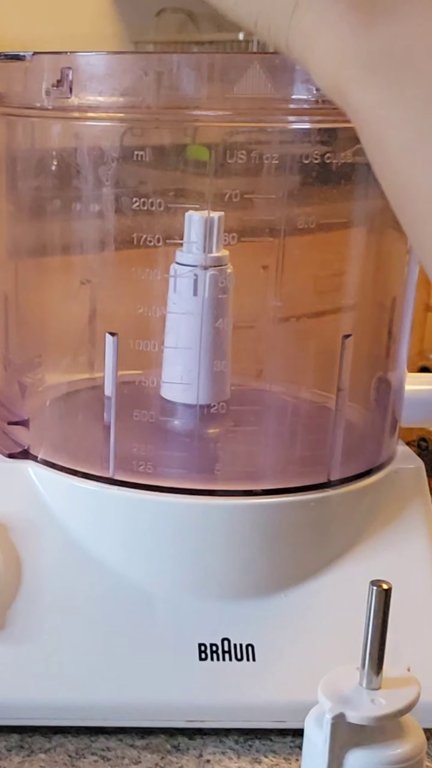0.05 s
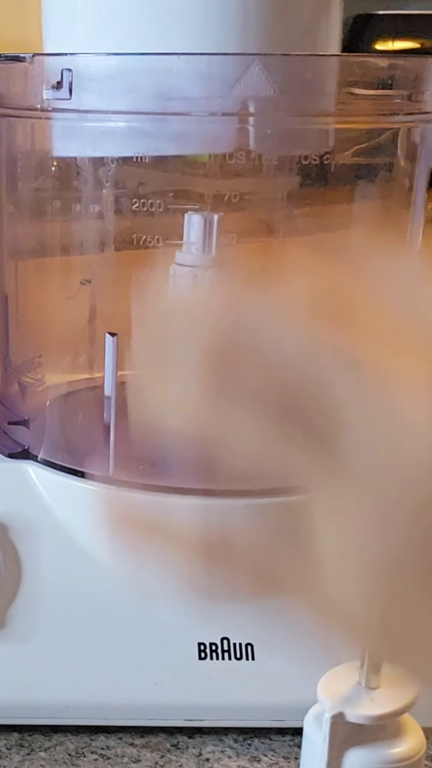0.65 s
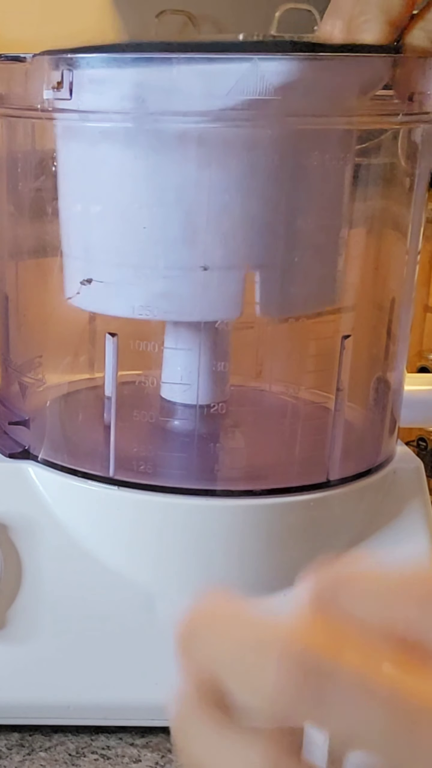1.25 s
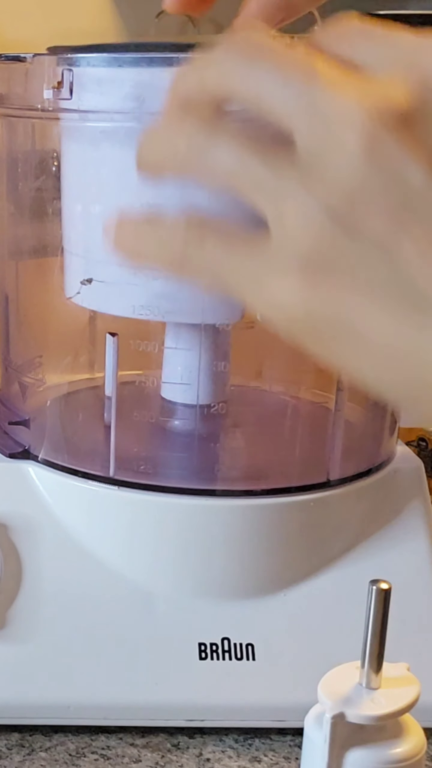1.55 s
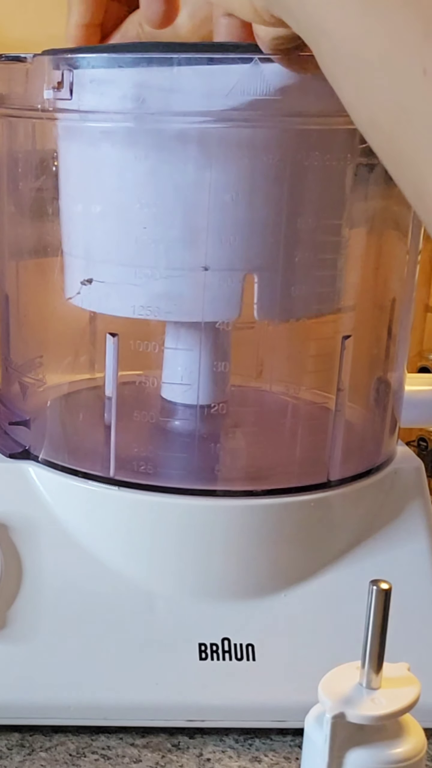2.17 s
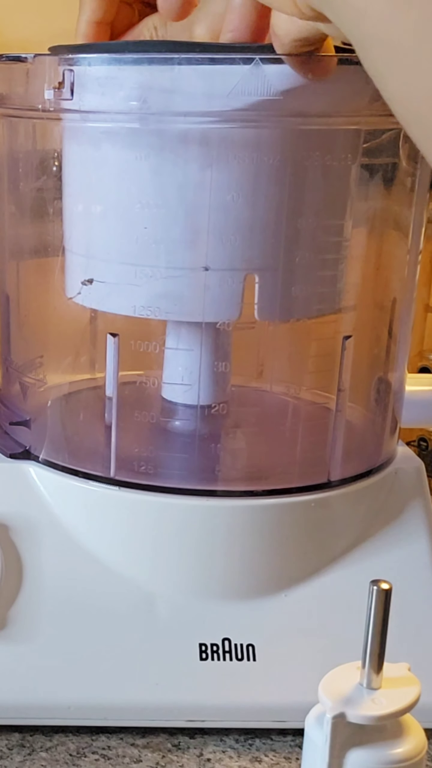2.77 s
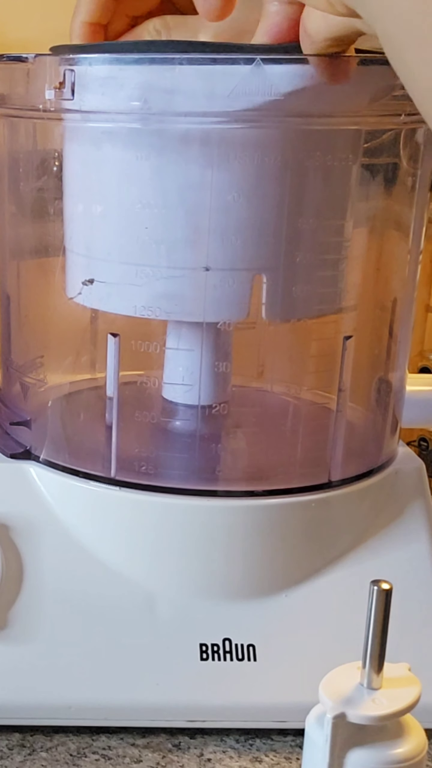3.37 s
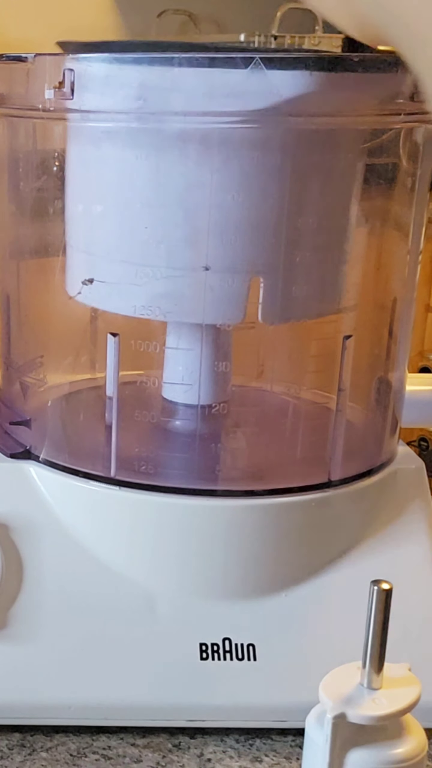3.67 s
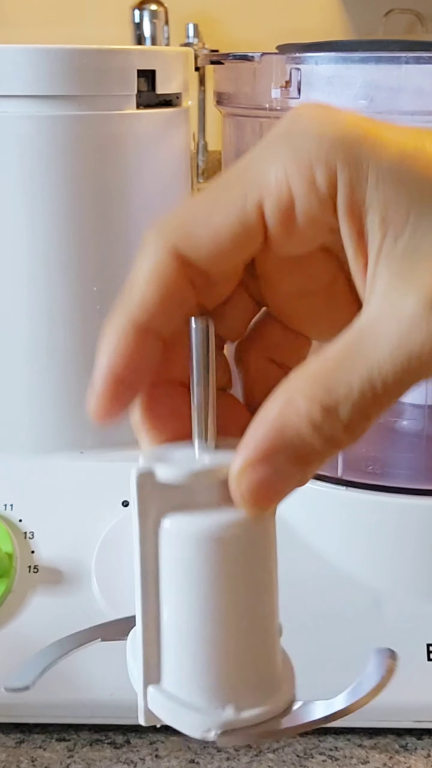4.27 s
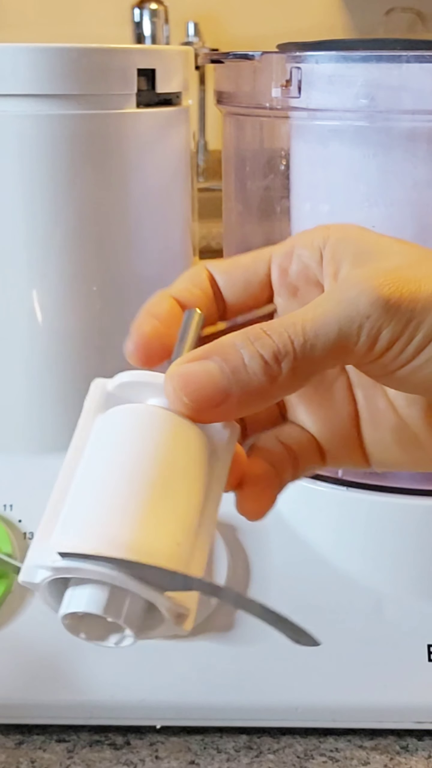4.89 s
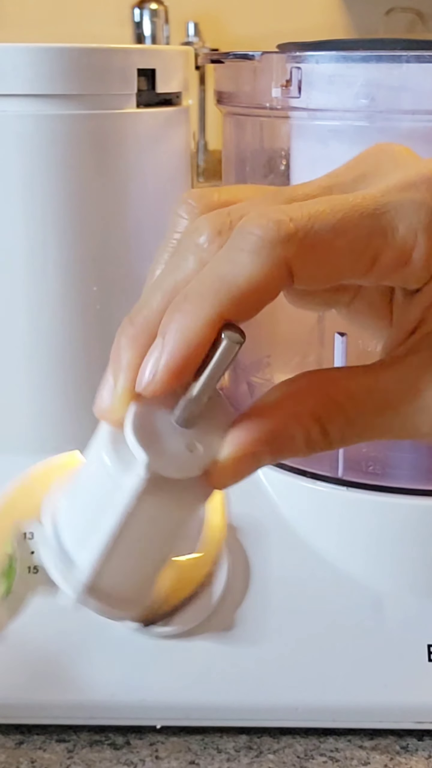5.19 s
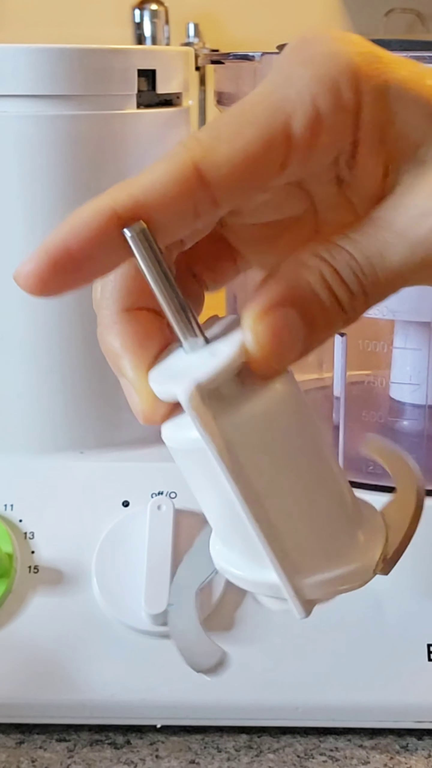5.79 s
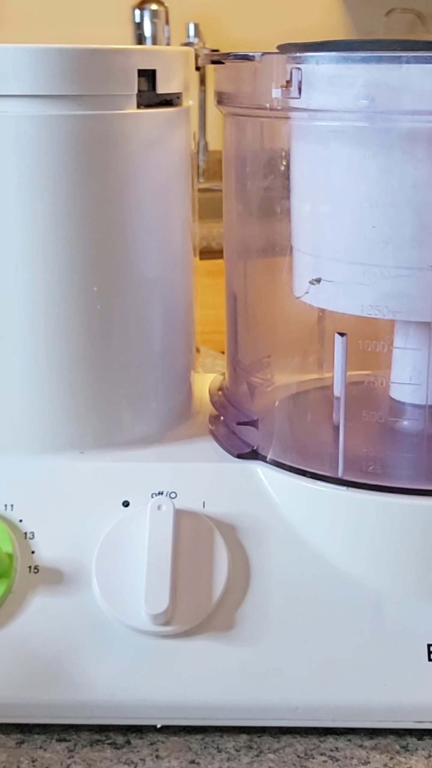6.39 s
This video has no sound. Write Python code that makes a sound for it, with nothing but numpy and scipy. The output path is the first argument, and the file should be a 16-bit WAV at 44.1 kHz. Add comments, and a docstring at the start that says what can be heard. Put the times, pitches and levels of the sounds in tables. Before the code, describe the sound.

A food processor is assembled close to the microphone, slightly to the left, in a small, quiet kitchen. After a faint click and light brushing, a plastic insert taps the bowl at about 0.6 seconds. From 0.8 to 1.3 seconds comes the loudest part: a quick cluster of hollow plastic knocks, each ringing briefly and thudding through the base into the worktop, with one tiny squeak near 1 second. From 1.5 to 2.6 seconds the insert is turned, with low rubbing, short scrapes on the rim and softer, thinning taps. Between 3.2 and 3.7 seconds another group of light clicks and a short scrape seat it. From there until the end, around 6.5 seconds, only the background that runs throughout remains: soft room noise, a low appliance hum and a very faint, thin electrical whine.

```python
"""A plastic insert is lowered into a food processor bowl, knocks onto the spindle and is turned until it seats.
Each knock rings the hollow bowl and its thin walls, and thuds through the base into the worktop.
Turning makes the bowl murmur and squeak once; between knocks, plastic and fingers slide on the rim.
The small kitchen is quiet but for soft room noise, a low appliance hum and a thin electrical whine."""
import sys
import numpy as np
from scipy import signal
from scipy.fft import rfft, irfft, next_fast_len
from scipy.io import wavfile

SR = 44100
rng = np.random.default_rng(int(sys.argv[2]) if len(sys.argv) > 2 else 0)


def digitize_waveform(pressure):
    """Quantize a signal to 16-bit integers and store it at the path in sys.argv[1].

    Rows of a 2-D input are taken as channels; values are limited to [-1, 1].
    """
    field = np.atleast_2d(pressure).T
    bounded = np.clip(field, -1, 1)
    quanta = np.round(bounded * 32767).astype(np.int16)
    wavfile.write(sys.argv[1], SR, quanta)


N = 288414

# The knocks: t/s, force/dB, hardness (0 cushioned, 1 bare edge), nearness to the stiff rim/dB,
# pitch favoured by the spot that is hit/Hz
CONTACTS = [(0.586, -34.5, 0.72, -5.5, 249), (0.8016, -23.5, 0.29, 1, 354), (0.931, -24.5, 0.67, -13, 376),
            (0.956, -26.5, 0.21, -3.5, 365), (1.0165, -23, 0.23, -1, 277), (1.025, -29, 0.64, 7, 1310),
            (1.243, -29, 0.14, -4, 800), (1.3036, -29.5, 0.1, -5.5, 266), (1.312, -36.5, 0.04, 12, 1440),
            (1.453, -41.5, 0.94, -2, 280), (1.493, -45.5, 0.093, -0.5, 290), (1.534, -43, 0, 2.5, 1430),
            (1.559, -44, 0.11, -7, 272), (1.608, -43.5, 0.16, -4.5, 282), (1.695, -47, 0, -5, 806),
            (1.728, -48.5, 0, 3, 1470), (1.817, -46, 0.21, -3, 278), (2.139, -43, .3, 3.5, 298),
            (2.403, -47, 0.079, -8.5, 750), (2.637, -46.5, 0.24, -2.5, 287), (3.222, -40, 0.77, 6.5, 1520),
            (3.2278, -40.5, 0.73, 7, 282), (3.419, -48, 0.3, -1.5, 276), (3.504, -40, 0.23, 3.5, 280),
            (3.513, -47, 0.12, 2.5, 1630), (3.624, -47.5, 0.96, 2.5, 270), (3.638, -44.5, 0.74, 6, 1300),
            (3.679, -41.5, 0, 1, 1300), (3.688, -40, 0, -4, 368)]
ORDINARY_DB = -32   # force of an ordinary knock
# The tones at which bowl and insert ring: f/Hz, level/dB, time to fade by 60 dB/s
BOWL_TONES = [(225, -10.5, 0.062), (265.5, 1.5, 0.094), (294, 0.5, 0.073), (371.5, 1, 0.085),
              (475, -12, 0.097), (632, -0.5, 0.042), (705, 3, 0.12), (811.7, 4.5, 0.061), (988, -26, 0.18),
              (1150, -18, 0.027), (1307, -1, 0.077), (1467, 4, 0.044), (1527, -11.5, 0.093),
              (1873, -5.5, 0.05), (2340, -12.5, 0.12), (2430, -12, 0.072), (3004, -7, 0.11),
              (3730, -11, 0.14), (4280, -4, 0.057), (5350, -40, 0.083)]
# How alike left and right are for nearby sounds: f/Hz, likeness (1 same, -1 opposite)
NEAR_LIKENESS = [(100, 1), (300, 0.89), (700, 0.48), (1400, 0.26), (3000, -0.32), (8000, 0.15)]


def from_db(db):
    """Turn decibels into a gain."""
    return 10 ** (np.asarray(db) / 20)


def rms_one(x):
    """Scale a signal to an average strength (rms) of 1."""
    return x / np.sqrt(np.mean(x ** 2) + 1e-20)


def at_hz(points, hz):
    """Read between the rows of a table, giving each octave equal room."""
    f, value = np.transpose(points)
    return np.interp(np.log(np.maximum(hz, 1)), np.log(f), value)


def add(out, s, sound):
    """Mix a sound in, starting at s seconds."""
    start = max(round(s * SR), 0)
    out[:, start:start + sound.shape[-1]] += sound[:, :N - start]


def band(x, low, high):
    """Keep the frequencies between low and high."""
    return signal.sosfilt(signal.butter(3, [low, high], "band", fs=SR, output="sos"), x)


def resonance(x, hz, width_hz):
    """Let one pitch through at full strength and weaken the rest."""
    r = np.exp(-np.pi * width_hz / SR)
    feedback = [1, -2 * r * np.cos(2 * np.pi * hz / SR), r * r]
    return signal.lfilter(np.array([1, 0, -1]) * (1 - r * r) / 2, feedback, x)


def ring(force, hz, fade_s):
    """Each push starts a pure tone that fades by 60 dB in fade_s."""
    r, w = from_db(-60 / (fade_s * SR)), 2 * np.pi * hz / SR
    return signal.lfilter([0, np.sin(w)], [1, -2 * r * np.cos(w), r * r], force + 1e-18)


def stereo_noise(spectrum, likeness, size):
    """Shaped noise whose left and right agree as far as the likeness table says."""
    hz = np.fft.rfftfreq(size, 1 / SR)
    mid, side = rfft(rng.standard_normal((2, size)))
    alike = np.clip(at_hz(likeness, hz), -1, 1)
    both = np.sqrt(1 + alike) * mid + np.sqrt(1 - alike) * side * [[1], [-1]]
    return rms_one(irfft(both * from_db(at_hz(spectrum, hz)), size))


def long_noise(spectrum, likeness):
    """Stereo noise as long as the scene."""
    return stereo_noise(spectrum, likeness, size=next_fast_len(N, True))[:, :N]


def graininess(spread_db, per_s, size):
    """The uneven loudness of surfaces that catch and slip."""
    steps = np.arange(size) * per_s / SR
    heights = rng.standard_normal(size // 10 + 2)
    return rms_one(from_db(spread_db * np.interp(steps, np.arange(len(heights)), heights)))


def room_noise():
    """The low murmur of room air and a faint, far rush."""
    # Loudness over time: t/s, level/dB
    air_level = [(0, -55.5), (2.0, -54.5), (3.7, -54), (3.8, -53.5), (6.5, -55.5)]
    rush_level = [(0, -76), (3.7, -71.5), (3.8, -69), (5.0, -68.5), (6.5, -72.5)]
    # Tone colour: f/Hz, level/dB
    air_spectrum = [(20, -16), (32, -1.5), (55, -0.5), (95, 2), (122, -1.5), (162, 1.5), (185, -9.5),
                    (250, -5), (370, -15.5), (550, -15), (1400, -27.5), (2600, -36.5), (4500, -45.5),
                    (7000, -54), (9500, -63), (14500, -48.5)]
    rush_spectrum = [(200, -5), (500, 4), (1400, 16.5), (2400, -3.5), (5000, -78), (16000, -62.5)]
    # How alike left and right are: f/Hz, likeness (-1 to 1)
    likeness = [(40, 0.54), (150, 0.97), (300, 0.68), (650, 0.028), (1400, -0.29), (3000, 0.2),
                (12000, -0.14)]
    t = np.arange(N) / SR
    air = from_db(np.interp(t, *np.transpose(air_level))) * long_noise(air_spectrum, likeness)
    rush = from_db(np.interp(t, *np.transpose(rush_level))) * long_noise(rush_spectrum, likeness)
    return air + rush


def hum(steady):
    """Low appliance tones, each with a steady part and a part that wanders."""
    # The tones: f/Hz, width/Hz, level/dB, left over right/dB
    tones = [(39.7, 1, -52, 0), (79.4, 3, -65, 0), (159, 10, -68, 0), (200, 6, -66, 0)]
    t, out = np.arange(N) / SR, 0
    for hz, width_hz, db, pan_db in tones:
        smooth = signal.butter(2, width_hz / 2, fs=1000, output="sos")
        wander = signal.sosfilt(smooth, rng.standard_normal((2, 9000)))[:, 2000:]
        swell, drift = [np.interp(t * 1000, np.arange(len(w)), rms_one(w)) for w in wander]
        phase = 2 * np.pi * hz * t
        tone = rms_one((steady + swell) * np.sin(phase) + drift * np.cos(phase))
        out += tone * from_db(db + np.array([[pan_db], [-pan_db]]) / 2)
    return out


def whine(pitch_hz):
    """A thin electrical whine: narrow bands of noise at multiples of one pitch."""
    # The bands: multiple of the pitch, width/Hz, level/dB, left over right/dB
    bands = [(1, 57, -86, -8), (2, 70, -84.5, -10.5), (3, 1600, -94.5, -5.5)]
    out = 0
    for multiple, width_hz, db, pan_db in bands:
        hz = multiple * pitch_hz
        hiss = resonance(rng.standard_normal((2, N)), hz, width_hz)
        tone = rms_one(resonance(hiss, hz, width_hz=820))
        out += tone * from_db(db + np.array([[pan_db], [-pan_db]]) / 2)
    return out


def kitchen_echo(x, first_echo_s):
    """Reflections build up after the first echo; each octave dies away at its own pace."""
    # Length of the echo: f/Hz, time to fade by 60 dB/s
    fade_times = [(100, 0.07), (300, 0.17), (800, 0.28), (2000, 0.26), (5000, 0.25), (15000, 0.15)]
    # Strength of the echo: f/Hz, level/dB
    levels = [(100, -14.5), (300, -30), (800, -22), (2000, -26), (5000, -16), (15000, -16.5)]
    t = np.arange(SR // 2) / SR
    noise = stereo_noise([(20, 0), (20000, 0)], NEAR_LIKENESS, size=len(t))
    build_up = np.clip(t / first_echo_s - 1, 0, 1)
    response = 0
    for low in 62.5 * 2 ** np.arange(8):
        centre = low * np.sqrt(2)
        tail = band(noise, low, 2 * low) * from_db(-60 * t / at_hz(fade_times, centre)) * build_up
        response += from_db(at_hz(levels, centre)) * tail / np.sqrt(np.sum(tail ** 2) / 2)
    return signal.fftconvolve(x, response, axes=1)[:, :N]


def dry_clicks():
    """Faint, very short clicks with no ring."""
    # The clicks: t/s, level before softening/dB
    clicks = [(0.0631, -33.5), (3.7485, -41), (3.755, -47)]
    out = np.zeros((1, N))
    for s, db in clicks:
        add(out, s, from_db([[db]]))
    return signal.lfilter([.5], [1, -.5], out)


def slides(rim_db, hiss_db):
    """Plastic catches and slips in fine grains under each short stroke, and the rim rings along."""
    # The strokes: middle t/s, half length/s, level/dB
    strokes = [(0.005, 0.0088, -56.5), (0.049, 0.045, -69), (0.163, 0.027, -60), (0.244, .012, -68),
               (0.595, 0.016, -52), (0.64, 0.052, -72.5), (1.143, 0.065, -65.5), (1.295, 0.033, -58),
               (1.458, 0.021, -51), (1.784, 0.02, -66), (1.921, 0.02, -60), (2.02, 0.034, -65),
               (2.077, 0.021, -59), (2.149, 0.021, -64.5), (3.228, 0.023, -61.5), (3.385, 0.037, -73),
               (3.482, 0.024, -69), (3.648, .019, -47)]
    # Tone colour of the rubbing: f/Hz, level/dB
    rasp_spectrum = [(500, -7), (1500, -1), (2400, 0), (3400, -1), (4800, -4), (6500, -10), (10000, -13.5),
                     (16000, -35)]
    hiss_spectrum = [(2000, -33), (5000, -7.5), (7000, -11), (12000, 2), (16000, -2)]
    # Tones of the rubbed rim: f/Hz, width/Hz, level/dB
    rim_tones = [(1750, 220, 0), (2170, 71, -6), (3186, 300, 4.5), (3780, 540, 0), (4640, 190, 1),
                 (7700, 1200, 0), (11060, 340, 11)]
    t = np.arange(N) / SR
    pressure = sum(from_db(db) * np.exp(-np.minimum(((t - s) / half_s) ** 2, 20))
                   for s, half_s, db in strokes)
    friction = long_noise(rasp_spectrum, NEAR_LIKENESS)
    rim = sum(from_db(db) * resonance(friction, hz, width_hz) for hz, width_hz, db in rim_tones)
    rasp = rms_one(friction + from_db(rim_db) * rim)
    grains = graininess(spread_db=3.0, per_s=670, size=N)
    hiss = from_db(hiss_db) * long_noise(hiss_spectrum, NEAR_LIKENESS)
    return grains * pressure * (rasp + hiss)


def squeak(s, half_s, hz, fall_hz_per_s, db):
    """The insert sticks and slips on the spindle for a few cycles: a short, slightly falling chirp."""
    t = np.arange(N) / SR - s
    phase = 2 * np.pi * (hz * t - fall_hz_per_s * t * t / 2)
    swell = np.exp(-np.minimum((t / half_s) ** 2, 20))
    return from_db(db) * swell * (np.sin(phase) + 0.098 * np.sin(2 * phase))


def turning_effort(grip_s=0.018, ease_db_per_s=16, release_db_per_s=398):
    """Each turn takes hold, eases as the insert slips into place, and lets go."""
    # Turns of the insert: start t/s, length/s, level/dB
    turns = [(0.868, 0.32, -48.5), (1.458, 0.41, -49.5), (2.39, 0.014, -48.5), (3.188, 0.053, -50),
             (3.363, 0.049, -54), (3.666, 0.031, -42.5)]
    effort = 0
    for s, length_s, db in turns:
        t = np.maximum(np.arange(N) / SR - s, 0)
        fall_db = ease_db_per_s * t + release_db_per_s * np.maximum(t - length_s, 0)
        effort += np.minimum(t / grip_s, 1) * from_db(db - fall_db)
    return effort


def grind(shell_db):
    """Soft slips of the insert on the spindle keep the bowl murmuring."""
    # Tone colour of the slips: f/Hz, level/dB
    spectrum = [(100, 9), (250, 4), (800, -1), (1600, -11.5), (2200, -17.5), (5000, -35), (16000, -84)]
    slips = graininess(spread_db=4.5, per_s=170, size=N) * long_noise(spectrum, NEAR_LIKENESS)
    bowl = sum((-1) ** k * from_db(db) * resonance(slips, hz, np.log(1000) / (np.pi * fade_s))
               for k, (hz, db, fade_s) in enumerate(BOWL_TONES))
    return turning_effort() * rms_one(bowl + from_db(shell_db) * slips)


def thuds(ordinary_thud_db, growth, glance_db):
    """Blows pass through the base into the worktop: heavy ones rock it, bare edges glance off."""
    # Tones of base and worktop: f/Hz, level/dB, time to fade by 60 dB/s
    base_tones = [(64, 0, .17), (80, -1, .15), (132, -11, .15)]
    force = np.zeros((1, N))
    for s, force_db, hardness, *_ in CONTACTS:
        push_db = ordinary_thud_db + growth * (force_db - ORDINARY_DB) + glance_db * hardness
        add(force, s, from_db([[push_db]]))
    return sum(from_db(db) * ring(force, hz, fade_s) for hz, db, fade_s in base_tones)


def bowl_ring(t, spread_db, detune, scatter_hz):
    """The bowl's main tones; grip and point of contact change each one's strength and pitch at random."""
    hz, level_db, fade_s = np.transpose(BOWL_TONES)[:, :, None]
    strength, bend, offset = rng.standard_normal((3, len(hz), 1))
    swing = from_db(level_db + spread_db * strength - 60 * t / fade_s)
    # low tones start together and reach both sides alike; high ones fall out of step
    scatter = np.minimum((hz / scatter_hz) ** 2, 1)
    phase = 2 * np.pi * (hz * (1 + detune * bend) * t + scatter * offset)
    return np.array([np.sum(swing * np.sin(phase + side * scatter * np.pi / 4), axis=0)
                     for side in (1, -1)])


def knock(levels_db, chatter_s, attack_s, favoured_hz, shell_db):
    """One contact: the thin shell chatters, the bowl rings, and the spot hit favours one pitch."""
    # Tone colour of the shell's many small vibrations: f/Hz, level/dB
    shell_spectrum = [(100, -10), (200, 2.5), (350, -3.5), (500, 0), (800, -4.5), (1500, -1.5), (2000, -15),
                      (3000, -5.5), (5000, -11), (7000, -22), (10000, -23.5), (16000, -37)]
    # Borders of the five bands from boom to tick: f/Hz
    borders = [145, 480, 1100, 2200, 6000, 15900]
    t = np.arange(SR // 6) / SR
    chatter = graininess(spread_db=6.0, per_s=968, size=len(t)) * np.exp(-t / max(chatter_s, .002))
    shell = from_db(shell_db) * chatter * stereo_noise(shell_spectrum, NEAR_LIKENESS, size=len(t))
    bowl = bowl_ring(t, spread_db=6.0, detune=0.012, scatter_hz=1260)
    sound = (shell + bowl) * (1 - np.exp(-t / attack_s))
    sound += from_db(4) * resonance(sound, favoured_hz, width_hz=favoured_hz / 4.7)
    out = 0
    for low, high, db in zip(borders, borders[1:], levels_db):
        part = band(sound, low, high)
        out += from_db(db) * part / np.std(part[:, :SR // 50])   # level set by the first 20 ms
    return out


def knocks():
    """Insert, spindle and bowl meet: force sets the loudness, hardness and place set the colour."""
    # Five bands, low to high (boom, wall, clack, crack, tick):
    # level when cushioned/dB, change for a bare edge/dB, share of the nearness to the rim
    bands = [(0, 0.5, 0), (-4, -8, -.5), (-8, -1.5, 1), (-28, 17, 0), (-43.5, 30.5, 0)]
    soft_db, edge_db, rim_share = np.transpose(bands)
    out = np.zeros((2, N))
    for s, force_db, hardness, rim_db, favoured_hz in CONTACTS:
        levels_db = force_db + soft_db + hardness * edge_db + rim_db * rim_share
        # stronger knocks chatter longer and swell faster; cushioning fingers slow the swell
        extra_db = force_db - ORDINARY_DB
        chatter_s = 0.0098 * from_db(0.21 * extra_db)
        attack_s = 0.00093 * from_db(4.5 * (1 - hardness) - 0.63 * extra_db)
        add(out, s, knock(levels_db, chatter_s, attack_s, favoured_hz, shell_db=10.5))
    return out


def scene():
    """The food processor, close by and slightly to the left, in the kitchen."""
    parts = knocks() + thuds(ordinary_thud_db=-46.5, growth=1.45, glance_db=-13)
    parts += grind(shell_db=-8.0) + slides(rim_db=4, hiss_db=-8.5)
    parts += squeak(s=.995, half_s=.006, hz=975, fall_hz_per_s=6000, db=-30)
    parts *= from_db([[.5], [-.5]])
    echo = kitchen_echo(parts, first_echo_s=0.006)
    background = room_noise() + hum(steady=7) + whine(pitch_hz=4085)
    return parts + echo + dry_clicks() + background


def record(dry):
    """The highest treble is cut off steeply."""
    cutoff_hz = 15900
    return signal.sosfilt(signal.ellip(10, .1, 80, cutoff_hz, fs=SR, output="sos"), dry)


dry = scene()
out = record(dry)
digitize_waveform(out)
```